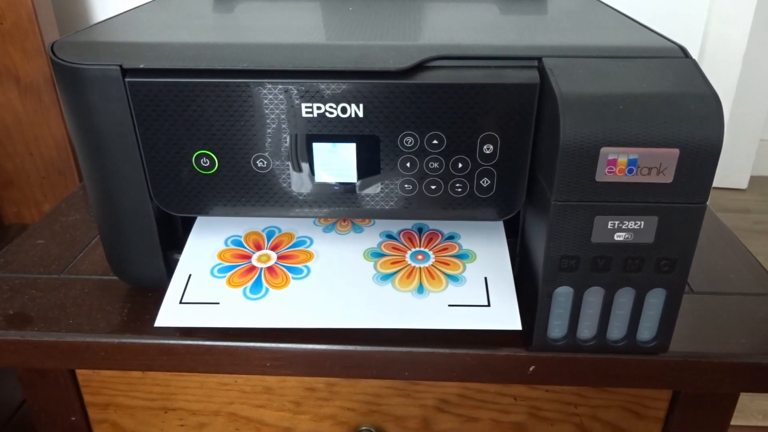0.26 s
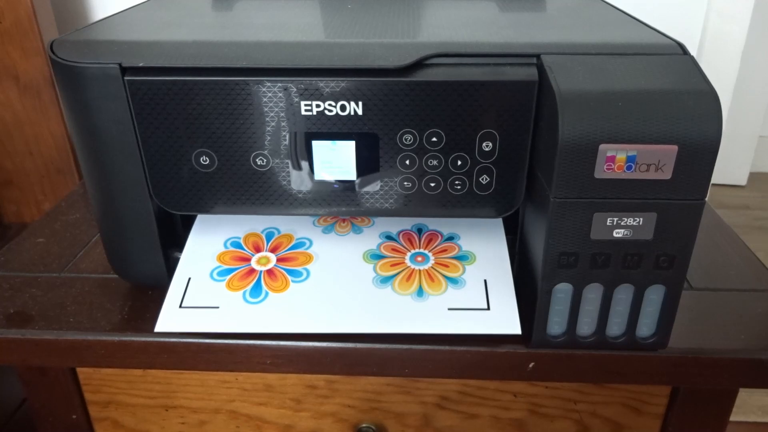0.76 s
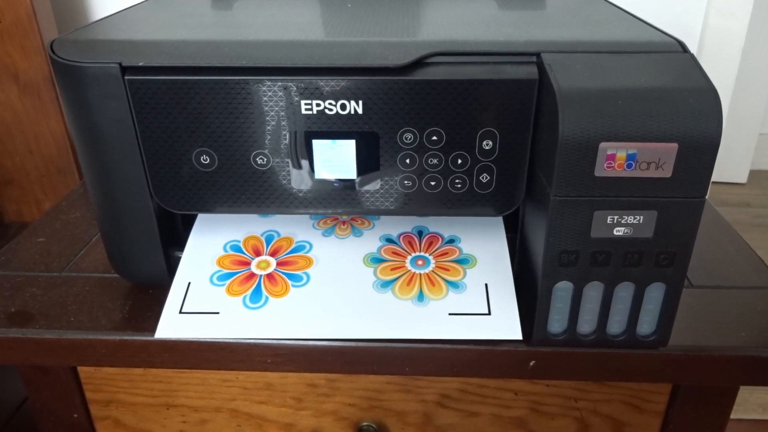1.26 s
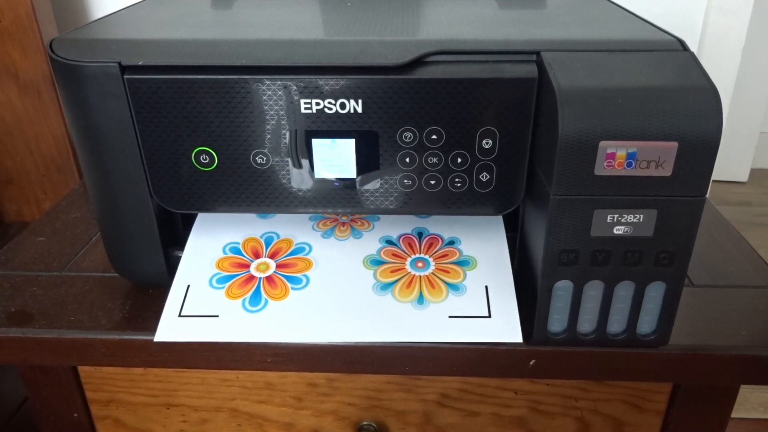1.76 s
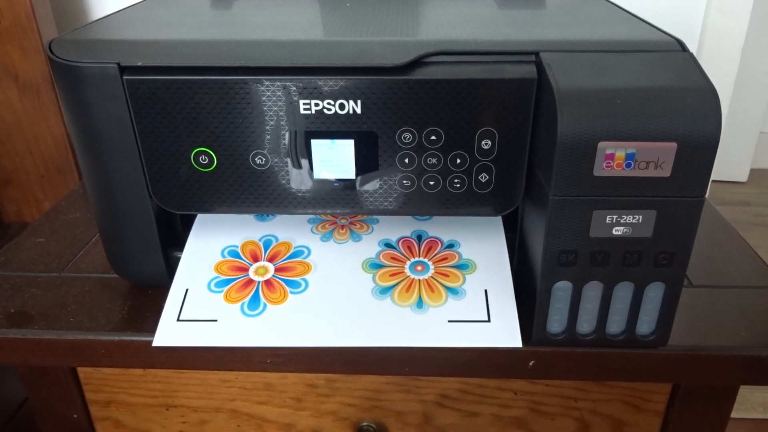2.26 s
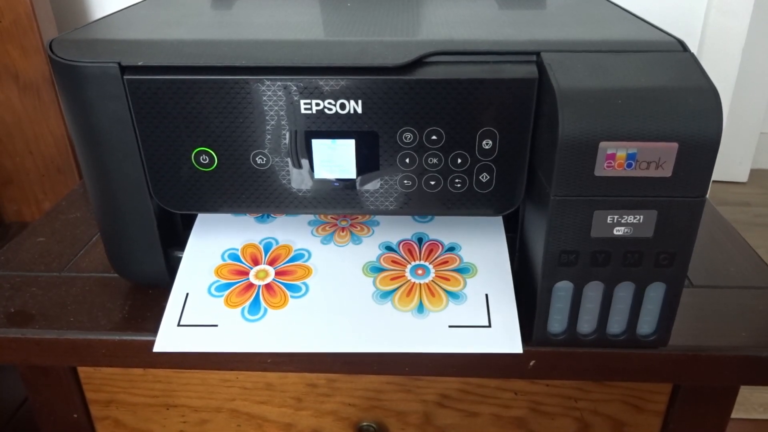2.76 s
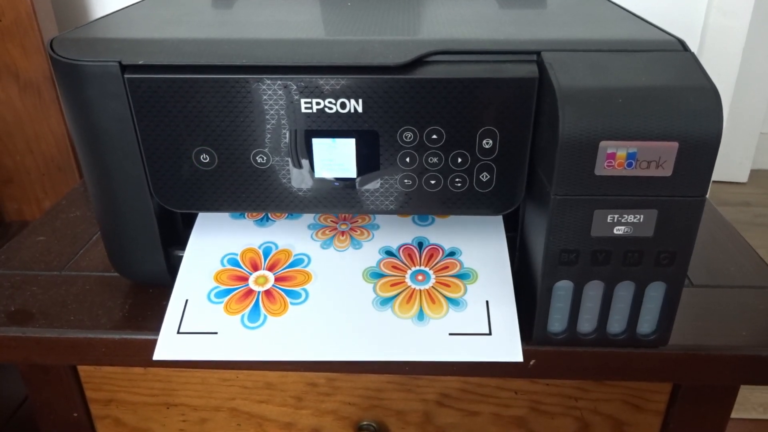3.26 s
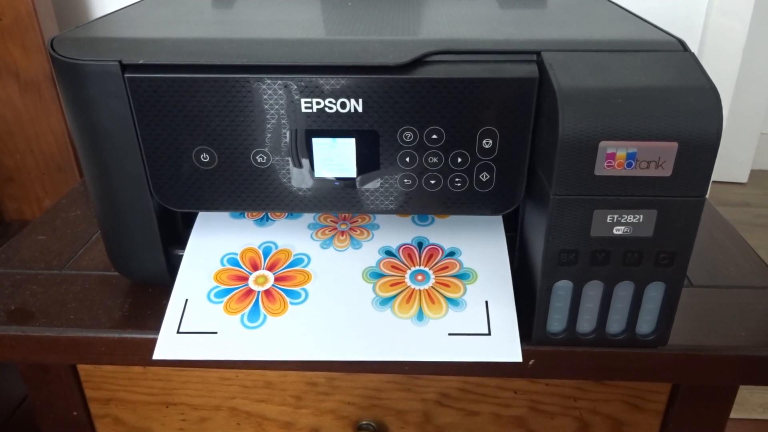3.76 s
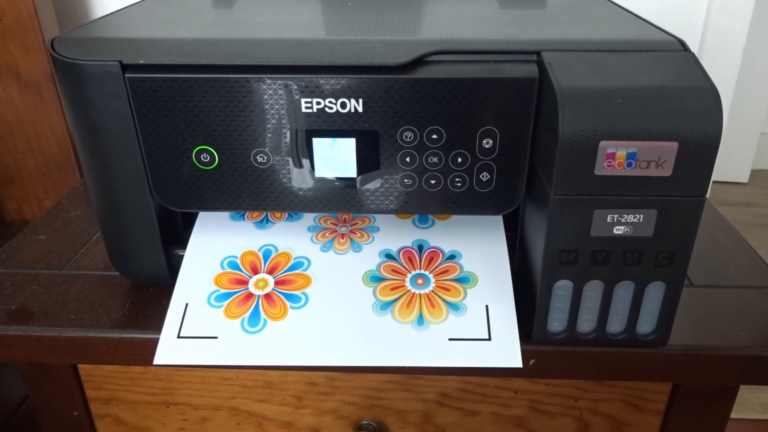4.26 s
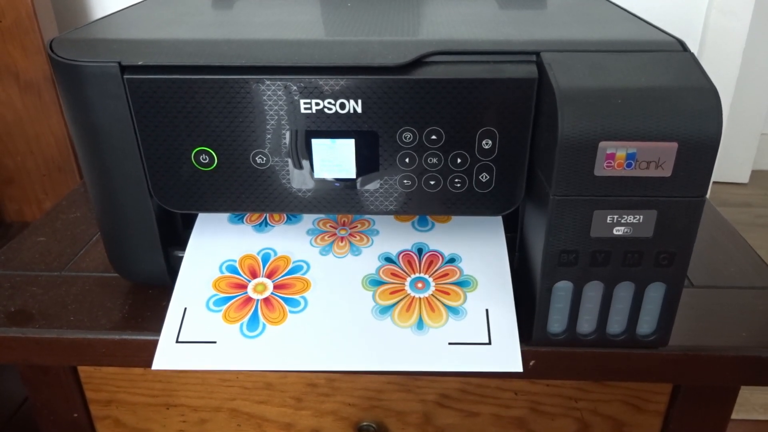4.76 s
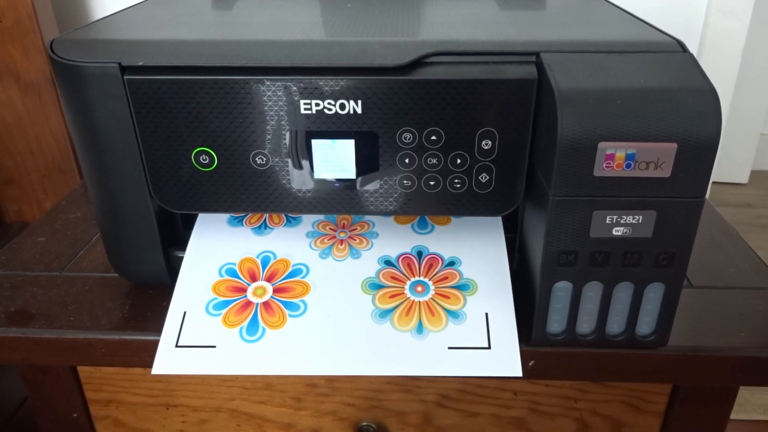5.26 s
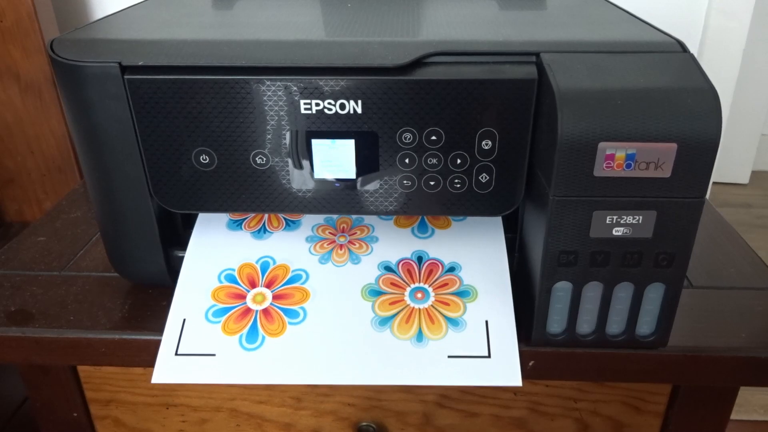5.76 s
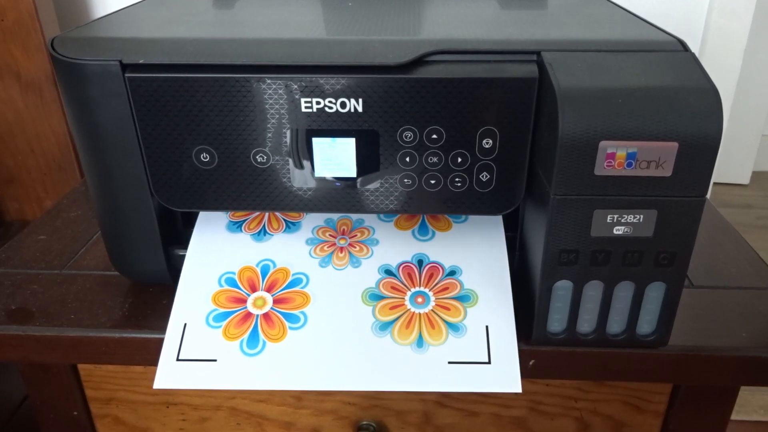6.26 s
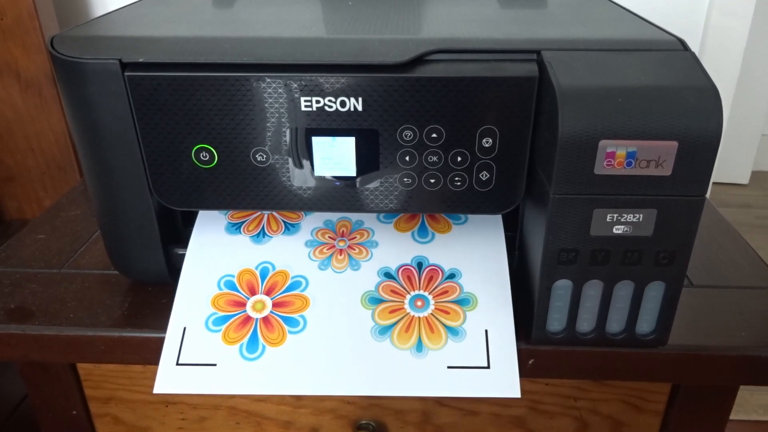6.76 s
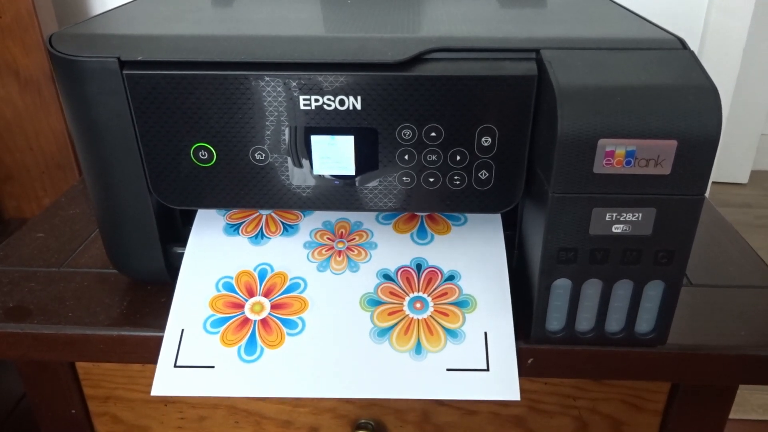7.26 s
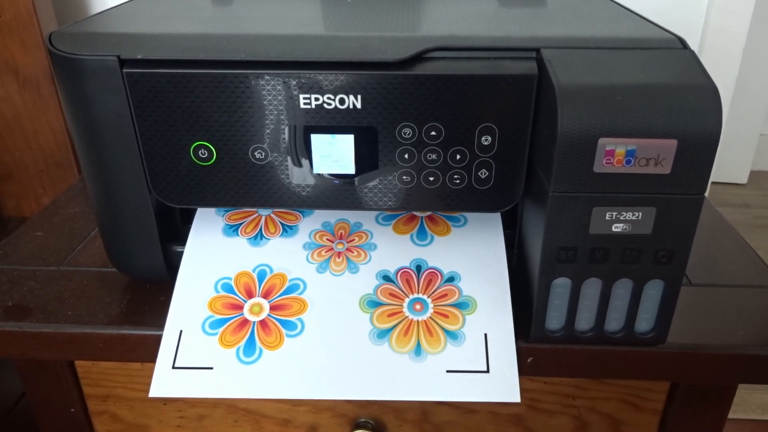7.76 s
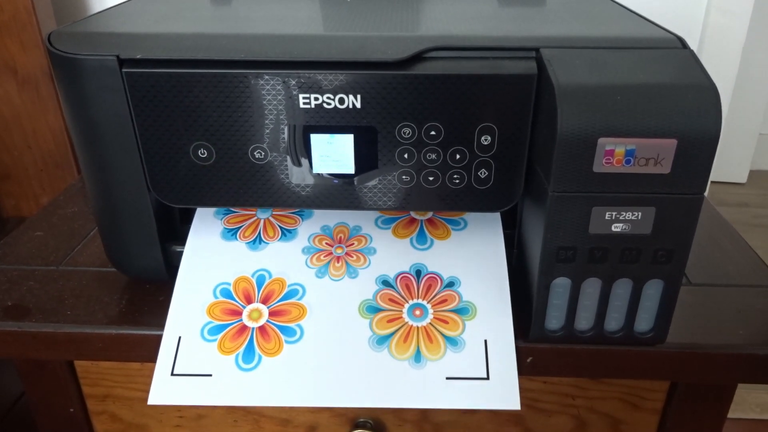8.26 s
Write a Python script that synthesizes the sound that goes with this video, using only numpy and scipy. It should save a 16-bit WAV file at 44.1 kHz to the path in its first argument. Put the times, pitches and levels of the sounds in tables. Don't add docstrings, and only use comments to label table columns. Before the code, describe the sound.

Close, steady printer shuttling: whirring strokes with light ticks, plastic knocks about every 0.4 seconds, a brief park, and one sharp paper snap.

```python
import sys
import numpy as np
from scipy import signal
from scipy.fft import rfft, irfft, next_fast_len
from scipy.io import wavfile
from scipy.ndimage import uniform_filter1d

SR = 44100
rng = np.random.default_rng(int(sys.argv[2]) if len(sys.argv) > 2 else 0)


def persist_wave(psi):
    counts = np.round(np.clip(psi, -1, 1) * 32767).astype(np.int16)
    wavfile.write(sys.argv[1], SR, np.atleast_2d(counts).T)


def how_loud(loudness_db):
    steps = np.asarray(loudness_db, float) / 20
    return 10 ** steps


N = 375291
t = np.arange(N) / SR

# start in seconds, then knock, rattle, settling thump and thud in dB.
TURNS = [(0.0014, -26.5, -44, -49.5, -43), (0.399, -28, -43, -48.5, -43),
         (0.7947, -31, -42.5, -50.5, -43.5), (1.1946, -28, -43, -56, -41.5),
         (1.595, -24, -41.5, -46.5, -44), (2.0067, -17.5, -40.5, -51, -44),
         (2.4175, -14.5, -41.5, -50, -43), (2.8384, -26.5, -42.5, -53.5, -43),
         (3.2533, -20.5, -39, -48, -44.5), (4.0792, -38, -46, -56, -44.5), (4.526, -27, -39, -46.5, -47),
         (4.9381, -24, -46.5, -54, -41), (5.3564, -23, -43, -49.5, -45), (5.779, -40, -45.5, -54.5, -44),
         (6.195, -25.5, -44, -47, -42), (6.6079, -31, -44, -54, -41), (7.026, -23.5, -42.5, -52, -40.5),
         (7.444, -21.5, -41.5, -58, -45.5), (7.8626, -15.5, -41, -48, -43),
         (8.2789, -28.5, -43.5, -68, -41.5)]
TURN_S = np.array(TURNS)[:, 0]
# time in seconds, level in dB.
LATCH = [(0.739, -26.5), (1.5393, -25), (2.3543, -26), (3.188, -26), (4.461, -26), (5.2893, -25),
         (6.132, -25.5), (6.9586, -25.5), (7.7983, -26)]
# time in seconds, level in dB, 60 dB decay time in seconds.
CLACK = [
    (4.5704, -11.5, .025),
    (4.578, -12, 0.026),
    (4.586, -20, 0.034),
    (4.598, -27, .03),
    (4.617, -20, .03),
    (4.625, -22, 0.024),
    (4.652, -23, 0.049),
    (4.567, -31, .02),
]
# frequency in Hz, level in dB per Hz.
KNOCK = [(120, -60), (200, -44), (579, 4), (1590, 2), (2440, -0.5), (3500, 1.5), (4220, -7), (6590, -21),
         (12000, -30), (15600, -61), (22000, -120)]
# frequency in Hz, level in dB.
ECHO_COLOUR = [(100, -6), (800, -2), (1500, 0), (6500, 0), (10000, -3), (16000, -10)]

PAUSE_S = 3.70
MOTOR_HZ = 292.3
JET_DELAY_S = .1118
TURNED_S, TURNED_DB = 3.25, -5.5
BUMP_CONTACT = 3.0


def shape(points, size):
    hz, db = np.transpose(points)
    return how_loud(np.interp(np.log(np.fft.rfftfreq(size, 1 / SR) + 1), np.log(hz), db))


def colour(x, points, size=8192):
    ceps = irfft(np.log(shape(points, size)))
    ceps[1:size // 2] *= 2
    ceps[size // 2 + 1:] = 0
    taps = irfft(np.exp(rfft(ceps)))[:size // 4]
    return signal.fftconvolve(x, taps / np.sqrt(np.sum(taps ** 2)))[:N]


def resonate(x, hz, width_hz):
    return signal.lfilter(*signal.iirpeak(hz, hz / width_hz, SR), x)


def walk(rate):
    count = int(t[-1] * rate) + 2
    return 1.22 * np.interp(t * rate, np.arange(count), rng.standard_normal(count))


def grit(spread_db):
    x = rng.standard_normal(N) * how_loud(spread_db * rng.exponential(size=N))
    return x / x.std()


def bursts(times, dbs, rise, hold, t60):
    out = np.zeros(N)
    count = len(times)
    for s, db, fall in zip(times, np.broadcast_to(dbs, count), np.broadcast_to(t60, count)):
        now = slice(max(int((s - rise) * SR), 0), int((s + hold + fall) * SR))
        late = t[now] - s
        out[now] += how_loud(db - 60 * np.maximum(late - hold, 0) / fall) * np.clip(1 + late / rise, 0, 1)
    return out


def tail(x, t60):
    s = np.arange(int(t60 * SR)) / SR
    taps = rng.standard_normal(len(s)) * how_loud(-60 * s / t60)
    return signal.fftconvolve(x, taps / np.sqrt(np.sum(taps ** 2)))[:N]


def whistle(hz, db):
    return np.sqrt(2) * how_loud(db + 2.0 * walk(22)) * np.sin(2 * np.pi * hz * t)


def wander(width_hz):
    return walk(width_hz) + 1j * walk(width_hz)


def drone(hz, width_hz, db):
    return how_loud(db) * (wander(width_hz) * np.exp(2j * np.pi * hz * t)).real


def motion():
    # time in seconds, share of full speed.
    speed_up = [(-.07, .1), (-.004, .77), (.006, .78), (.02, .88), (.04, .96), (.065, 1)]
    brake_s = .035
    stroke = np.maximum(np.searchsorted(TURN_S, t) - 1, 0)
    ends = np.append(TURN_S[1:], t[-1] + 1)
    ends = np.where((TURN_S < PAUSE_S) & (ends > PAUSE_S), PAUSE_S, ends)
    since_turn = t - TURN_S[stroke]
    since = since_turn - JET_DELAY_S
    brake = np.clip((ends[stroke] + .02 - t) / brake_s, 0, 1)
    old_stroke = np.clip(.6 - since_turn / brake_s, 0, 1)
    speed = np.maximum(np.interp(since, *np.transpose(speed_up)) * brake, old_stroke)
    return speed, since, stroke % 2


def whine(speed, since, back):
    # multiple of the motor rate, width in Hz, level out and
    # level back in dB, time of the swell out and back in seconds after the nozzles start.
    partials = [(0.499, 27, -70, -77, 0.082, 0.096), (1.059, 60, -66, -65.5, 0.008, 0.078),
                (2.056, 110, -64.5, -69.5, 0.163, 0.13), (4.31, 170, -67.5, -60.5, 0.14, 0.13),
                (6.7, 170, -68.5, -68, 0.205, 0.215), (5.39, 32, -95, -68, .1, 0.042),
                (9.82, 47, -72.5, -70, 0.14, 0.17), (11.39, 320, -68, -64, 0.092, 0.056),
                (14.74, 90, -72, -76, 0.14, 0.26), (19.94, 400, -65.5, -62, 0.13, 0.168),
                (20.47, 510, -64.5, -73, 0.13, 0.1), (23.5, 550, -86, -70, 0.28, 0.11),
                (25.1, 1100, -67.5, -67.5, 0.125, 0.24), (27.16, 580, -63, -65, 0.176, 0.084),
                (30.1, 120, -67.5, -69.5, 0.23, 0.11)]
    swell_db, swell_s, drift_per_s = 4.5, 0.026, .12
    phase = 2 * np.pi * np.cumsum(MOTOR_HZ * speed) / SR
    rail_phase = 2 * np.pi * MOTOR_HZ * t
    climb = drift_per_s * np.clip(since - .15, -.2, .2) * (1 - 2 * back)
    drift = 2 * np.pi * np.cumsum(MOTOR_HZ * speed * climb) / SR
    out = 0
    for k, width_hz, out_db, back_db, out_s, back_s in partials:
        swell = swell_db * np.exp(-((since - np.where(back, back_s, out_s)) / swell_s) ** 2)
        turning = (rail_phase if 19 < k < 21 else phase) + drift * (width_hz > 200)
        steady = .8 * (k > 29)
        tone = (steady + wander(width_hz)) * np.exp(1j * k * turning)
        out = out + how_loud(np.where(back, back_db, out_db) + swell) * tone.real
    return out * uniform_filter1d(how_loud(-40 * (1 - speed)) * (speed > .62), size=400)


def nozzles(speed):
    multiple, octave_db, rise_db = 30, -6, -71
    out_db, back_db, stop_db, t60_s = -54.5, -51.5, -61, .04
    phase = multiple * 2 * np.pi * np.cumsum(MOTOR_HZ * speed) / SR
    chirp = np.sin(phase) + how_loud(octave_db) * np.sin(2 * phase) * (speed < .93)
    quiet = [9, 10]
    starts = np.delete(TURN_S + JET_DELAY_S, quiet)
    start_db = np.delete(np.where(np.arange(len(TURN_S)) % 2, back_db, out_db), quiet)
    sung = bursts(starts, start_db, 0.0042, 0.0046, t60_s)
    sung = sung + bursts(TURN_S[1:] - .008, stop_db, 0.0072, 0.015, t60_s)
    chirp = chirp * sung * how_loud(2.0 * walk(300) + 0.5)
    rising = bursts(starts + 0.011, rise_db, .006, .014, .03) * how_loud(3 * walk(150)) * np.sin(2 * phase)
    return chirp * np.clip(3 * speed - .3, 0, 1) + rising * (speed < .93)


def rail(speed):
    # frequency in Hz, level in dB per Hz.
    rub_colour = [(59, -63), (100, -51), (140, -12), (295, -5), (365, -5), (397, -0.5), (816, 0.5),
                  (1100, -0.5), (1950, -7.5), (3310, -6.5), (5390, -11.5), (5860, -8.5), (6380, -9.5),
                  (8060, -13), (15900, -37)]
    air_colour = [(5470, -12.5), (9300, -6), (11500, -5), (14100, -8.5), (15900, -11)]
    # time in seconds, change in dB.
    parking = [
        (3.64, -6),
        (3.72, 0.5),
        (3.77, -3),
        (3.83, -16),
        (3.92, -18),
        (4.07, -28),
        (4.13, -2),
        (4.23, -4),
        (4.32, -6.5),
    ]
    load_db = np.interp(t, *np.transpose(parking))
    slow = uniform_filter1d(1 - speed, size=2000)
    rub = colour(grit(spread_db=1.5), rub_colour)
    low, upto = (signal.sosfilt(signal.butter(3, hz, fs=SR, output="sos"), rub) for hz in (3000, 9500))
    air = colour(grit(spread_db=2.0), air_colour) * how_loud(-1.5 * (t < TURNED_S) + 1.2 * walk(9))
    out = 0
    for band, db, slow_db, flicker_db in ((low, -50.5, -5.5, 1.5), (upto - low, -48.5, -3, 1.2),
                                          (air, -58, -2.5, 1.5)):
        level_db = db + load_db + slow_db * slow + flicker_db * walk(60)
        out = out + band / band.std() * how_loud(level_db)
    return out


def panel_hum(since, back):
    hz, width_hz, rise_s, t60_s = 1086, 60, 0.022, 0.12
    starts, ends = TURN_S[1::2], TURN_S[::2]
    level = how_loud(-61) * uniform_filter1d(1. * back * (since > 0), size=1500)
    level = level + bursts(starts + .15, -55, rise_s, 0.0065, t60_s)
    level = level + bursts(ends[1:] - .102, -53, rise_s, 0.0085, t60_s)
    level = level + bursts(ends - .07, -57, 0.028, 0.051, t60_s)
    waver = .9 + .35 * wander(width_hz)
    return level * (waver * np.exp(2j * np.pi * hz * t)).real


def groans():
    # frequency in Hz, width in Hz, level in dB.
    belt = [(296, 80, -60), (598, 120, -54), (797, 130, -60)]
    rundown = [(242, 80, -60), (409, 200, -57), (680, 250, -59)]
    far = np.delete(TURN_S[1::2], 4)
    braking = np.append(far, PAUSE_S - .03) - .015
    latch_s = np.array(LATCH)[:, 0]
    out = bursts(braking, 0, 0.082, 0.017, 0.11) * sum(drone(*row) for row in belt)
    shell = drone(hz=600, width_hz=150, db=-53)
    chest = drone(hz=290, width_hz=110, db=-58)
    out = out + bursts(latch_s + 0.0051, 0, .008, 0.0091, 0.19) * shell
    out = out + bursts(far + 0.048, 0, .04, 0.13, .25) * chest
    return out + bursts([3.755], 0, 0.15, 0.042, 0.37) * sum(drone(*row) for row in rundown)


def case(x):
    # frequency in Hz, width in Hz, level in dB.
    modes = [(146, 30, -11), (215, 40, -4), (290, 50, -2), (515, 130, -1), (720, 110, -2), (1085, 120, 0),
             (1400, 140, -2), (1930, 250, -1), (2700, 400, -3)]
    return x + sum(how_loud(db + 2.5 * walk(6.7)) * resonate(x, hz, width_hz) for hz, width_hz, db in modes)


def blows(times, dbs, points, contact):
    x = bursts(times, dbs - 6, .001, .0015, .03) * grit(1.5)
    x[(times * SR).astype(int)] += contact * how_loud(dbs)
    return colour(x, points)


def chatter(s, rattle_db):
    chance = rng.random((len(s), 8))
    times = s[:, None] + .006 + .065 * (np.arange(4) + chance[:, :4]) / 4
    dbs = rattle_db[:, None] - 1 - 8 * chance[:, 4:] - 40 * (times - s[:, None])
    return blows(times.ravel(), dbs.ravel(), KNOCK, BUMP_CONTACT)


def cracks(rows, cycles, gain_db):
    out, late = np.zeros(N), np.arange(1200) / SR
    for s, db, hz in rows:
        turned = late * hz
        ring = turned / cycles * np.exp(1 - turned / cycles) * np.sin(2 * np.pi * turned)
        out[int((s + .0005) * SR):][:1200] += how_loud(db + gain_db) * ring
    return out


def paper_feed():
    # frequency in Hz, level in dB per Hz.
    feed_colour = [(40, -69), (85, -42), (120, -43), (231, -18.5), (472, 2), (1260, 1.5), (1400, 3),
                   (1510, -13), (2140, -2), (2420, -20), (3030, -3.5), (4120, -9), (7770, -10),
                   (15900, -22)]
    thump_colour = [(59, -67), (110, -12.5), (191, 0), (490, 2.5), (800, -1), (1110, -9.5), (1380, -4),
                    (1630, -12), (2030, -7), (4000, -18.5), (5200, -40), (8800, -120)]
    bump_colour = [(180, -31), (300, -19), (1110, -1), (1660, -3.5), (3380, 1), (4500, -12), (6080, -31),
                   (12000, -48), (15600, -73), (22000, -120)]
    # time in seconds, level in dB.
    bumps = [(1.6318, -23.5), (2.0383, -19), (2.438, -38), (2.4764, -50.5), (4.9602, -50), (4.9756, -30),
             (5.808, -26), (5.813, -28.5), (6.2156, -34), (6.6283, -34), (7.042, -47), (7.0656, -37),
             (7.8748, -42), (7.9438, -47), (8.313, -35)]
    # time in seconds, level in dB.
    park = [
        (3.719, -38.5),
        (3.778, -52),
        (3.829, -54),
    ]
    # time in seconds,
    # level in dB, pitch in Hz.
    gear_cracks = [(0.4002, -37, 2310), (0.7959, -37, 1910), (0.798, -33, 1930), (1.1938, -38, 1910),
                   (1.5938, -30, 1960), (1.6301, -28.5, 2370), (2.0059, -27, 1920), (2.0086, -27, 2120),
                   (2.012, -36, 1020), (2.0377, -22.5, 3320), (2.4171, -26, 2400), (2.4374, -33, 1910),
                   (2.4758, -42, 1976), (2.8387, -35, 2220), (2.846, -38, 3200), (3.2545, -36, 1980),
                   (4.0785, -32.5, 1954), (4.0805, -37, 1930), (4.5231, -31, 2180), (4.5775, -18, 6970),
                   (4.9376, -30, 1930), (4.9749, -29.5, 2384), (5.3553, -29, 1823), (5.7783, -31, 2000),
                   (5.8072, -33, 2120), (6.1948, -31.5, 1913), (6.6072, -31, 1940), (6.609, -36, 3300),
                   (7.0254, -32, 1798), (7.0429, -27, 1940), (7.0654, -32, 2280), (7.443, -46, 1780),
                   (7.8619, -18.5, 2460), (7.8759, -33, 1865), (8.2789, -32, 2064), (8.3125, -37, 1900)]
    gear_taps = [(0.0269, -43, 980), (0.0722, -45, 1350.0), (0.4085, -41, 850.0), (0.4322, -43, 930),
                 (0.4893, -41, 710.0), (0.8496, -55, 1310.0), (0.8669, -49, 1160.0), (0.8812, -46, 1040.0),
                 (1.205, -56, 1300.0), (1.2232, -44, 1970.0), (1.6134, -43, 1040), (1.6694, -45, 1080),
                 (1.6805, -39, 1450), (2.0286, -32, 1990), (2.0588, -37, 2250), (2.4844, -43, 1100.0),
                 (2.4917, -45, 1060.0), (2.8616, -43, 1170.0), (2.875, -49, 716), (2.9039, -48, 840.0),
                 (3.3293, -43, 980), (3.3388, -45, 1100), (4.1078, -42, 2010.0), (5.0114, -45, 1040.0),
                 (5.384, -40, 1020.0), (5.4088, -45, 1140.0), (5.4275, -42.5, 1590), (5.435, -43, 937),
                 (5.8724, -50, 886), (6.2245, -41.5, 1026), (6.2485, -42.5, 750), (6.2642, -48, 1070),
                 (6.6492, -45, 2120.0), (6.6705, -48, 2150), (6.6898, -44, 1090), (7.0532, -39, 730),
                 (7.0972, -43, 1110), (7.114, -43, 980), (7.4697, -40, 1770), (7.4895, -43, 1004),
                 (7.4993, -43, 1060), (7.5152, -46.5, 711), (7.8866, -33, 710.0), (8.3222, -44, 712)]
    s, knock_db, rattle_db, thump_db, thud_db = np.transpose(TURNS)
    rattle = bursts(s + 0.0038, rattle_db, 0.0063, 0.029, 0.093) * how_loud(1.5 * walk(120) - 0.5)
    thump = bursts(s + 0.072, thump_db, 0.0072, 0.0026, 0.46)
    thump = thump + bursts(s + 0.014, thud_db, 0.016, 0.0021, 0.35)
    thump = thump + bursts(*np.transpose(park), 0.0097, 0.022, 0.38) * how_loud(-9.5)
    knocks = blows(s, knock_db, KNOCK, contact=4.0)
    knocks = knocks + blows(*np.transpose(bumps), bump_colour, BUMP_CONTACT)
    hits = how_loud(-6.5) * knocks + chatter(s, rattle_db)
    hits = hits + colour(rattle * grit(3), feed_colour) + colour(thump * grit(1.5), thump_colour)
    boom_hz = 600 * how_loud(1.6 * rng.standard_normal(len(s)))
    booms = zip(s + .005, thud_db, boom_hz)
    teeth = cracks(gear_cracks, cycles=0.91, gain_db=1) + cracks(gear_taps, cycles=1.68, gain_db=0.5)
    return how_loud(-6.0) * case(hits) + teeth + cracks(booms, cycles=1.7, gain_db=3)


def clack():
    # frequency in Hz, level in dB per Hz.
    sheet_colour = [(40, -79), (110, -13), (250, -14), (520, -12), (780, -2), (1100, -5), (1550, -7.5),
                    (2050, -2.5), (3300, -6.5), (4050, -13), (4700, -2), (5900, -2), (7200, -5.5),
                    (10500, -0.5), (15900, -8.5)]
    # frequency in Hz, width in Hz, level in dB.
    tray = [(760, 250, 2), (1017, 80, -2), (1976, 90, 0), (2640, 200, -6), (3494, 120, -3), (4900, 150, -2),
            (5884, 100, 2), (6487, 100, 0)]
    s, db, t60 = np.transpose(CLACK)
    snaps = bursts(s, db - 9, .003, .001, t60) * grit(1.5)
    rustle = bursts(s[:1], -32.5, .003, .03, 0.26) * grit(2.0)
    sheet = colour(snaps + colour(rustle, ECHO_COLOUR), sheet_colour)
    ring = sum(how_loud(db) * resonate(sheet, hz, width_hz) for hz, width_hz, db in tray)
    return how_loud(-2.2) * (sheet + ring)


def ticks():
    # time in seconds, level in dB, panel level relative to it in dB.
    stray = [
        (2.008, -35.5, 12),
        (3.2836, -42, 0),
        (3.6965, -27.5, -26),
        (4.22, -39, -3),
    ]
    # time in seconds, level in dB.
    cable = [(0.242, -35.5), (1.038, -35), (1.8456, -36), (2.672, -36), (3.5022, -35.5), (4.7702, -34),
             (5.611, -37), (6.4428, -37), (7.278, -36), (8.11, -37)]
    # frequency in Hz, level in dB per Hz.
    tick_colour = [(1180, -47), (2000, -8), (2700, 1), (3190, -1), (3800, 2.5), (4250, -2), (8660, -2.5),
                   (9610, -12), (11900, -7.5), (15900, -22)]
    latch_body_db, cable_body_db = 7, -6.5
    rows = stray + [(s, db - 5.5, latch_body_db) for s, db in LATCH]
    rows = rows + [(s, db + 1.2, cable_body_db) for s, db in cable]
    for lag_s, db in ((-0.036, -43), (0.079, -43.5)):
        rows = rows + [(row[0] + lag_s, db, cable_body_db) for row in cable]
    rows = rows + [(row[0] + 0.0806, row[2] - 5, latch_body_db) for row in TURNS]
    s, db, body_db = np.transpose(rows)
    swell = bursts(s + .0025, db - 10.5, .006, .001, .028)
    panel = bursts(s + 0.0035, db + body_db - 1.5, 0.0041, 0.0023, .045) * grit(2.0)
    return colour(swell * grit(2.2), tick_colour) + resonate(panel, 1150, 1150 / 3.0)


def spits():
    # time in seconds, level in dB.
    bright_spits = [(0.1959, -46), (0.3324, -47), (0.7346, -54), (0.992, -44), (1.1274, -47), (1.7997, -45),
                    (2.6268, -45.5), (3.457, -51), (3.696, -29), (4.4607, -29), (5.5653, -53), (6.3972, -51),
                    (6.5324, -49), (7.2334, -54)]
    # frequency in Hz, level in dB per Hz.
    spit_colour = [(3000, -37), (8000, -1), (10000, -3), (13500, -2), (15200, -9), (16500, -39)]
    s, db = np.transpose(bright_spits + [(at - 0.0054, db - 13.5) for at, db in LATCH])
    return colour(bursts(s + .001, db - 9, .0015, .001, .02) * grit(1.5), spit_colour)


def electronics(since, back):
    # frequency in Hz, level in dB.
    hold = [(10810, -75), (11246, -75), (14271, -76), (14702, -68), (15132, -69.5)]
    # start and end in seconds, frequency in Hz, level in dB.
    idle = [
        (3.5, 4.06, 4990, -75),
        (3.78, 3.99, 11240, -76),
        (3.82, 4.0, 9948, -83),
        (4.02, 4.1, 8770, -66),
        (3.8, 4.07, 1995, -72),
        (4.14, 4.21, 11240, -78),
    ]
    waiting = uniform_filter1d(1. * ((since > -.1) & (since < 0) & (abs(t - 4.35) > .35)), size=900)
    waiting = waiting * how_loud(-4 * back * (t < TURNED_S) + 1.6 * walk(25))
    parked = 0
    for a, b, hz, db in idle:
        parked = parked + np.interp(t, [a - .01, a, b, b + 0.019], [0, 1, 1, 0]) * whistle(hz, db)
    beam = how_loud(TURNED_DB * (t > TURNED_S))
    return waiting * sum(whistle(hz, db) * (beam if hz > 14500 else 1) for hz, db in hold) + parked


def swoops():
    top_hz, fall_hz_per_s = 15750, 36000
    starts = TURN_S[1:] - .014
    late = t - starts[np.maximum(np.searchsorted(starts, t) - 1, 0)]
    phase = 2 * np.pi * np.cumsum(top_hz - fall_hz_per_s * np.clip(late, 0, .03)) / SR
    flutter = how_loud(3 * walk(150) + TURNED_DB / 2 * (t > TURNED_S))
    return bursts(starts, -67, .004, .022, .03) * flutter * np.sin(phase)


def echoes(hits):
    return how_loud(-7.5) * colour(tail(hits, 0.36), ECHO_COLOUR)


def port_difference(printer, snap):
    # frequency in Hz, side relative to mid in dB.
    width = [(60, -37), (300, -22), (700, -12.5), (2400, -17), (6000, -15.5), (9000, -14.5), (15000, -13.5)]
    # frequency in Hz, level in dB per Hz.
    around = [(15, -53), (25, -25), (70, -30), (161, -25.5), (404, -9.5), (543, -10), (712, 5), (1010, -10),
              (1190, -8), (1480, -9.5), (5850, -22), (15900, -46)]
    size = next_fast_len(N)
    late = tail(np.roll(printer, int(.006 * SR)), .12)
    side = irfft(rfft(late, size) * shape(width, size), size)[:N]
    side = side + how_loud(-21) * tail(snap, .03) + how_loud(-55) * colour(rng.standard_normal(N), around)
    edge = signal.sosfilt(signal.butter(2, 8000, "high", fs=SR, output="sos"), snap)
    first = bursts([CLACK[0][0] - .002], 2, .003, 0.0033, 0.035)
    return side + tail(edge * first, 0.0037)


def room():
    # frequency in Hz, level in dB per Hz.
    room_colour = [(15, -70), (25, -42), (150, -24), (400, -9), (760, -8), (1200, -16), (1900, -10),
                   (3000, -20), (5000, -19), (9000, -22), (15900, -26)]
    return how_loud(-58) * colour(rng.standard_normal(N), room_colour)


def scene():
    speed, since, back = motion()
    snap = clack()
    hits = paper_feed() + ticks() + spits() + snap
    steady = whine(speed, since, back) + nozzles(speed) + rail(speed) + panel_hum(since, back)
    steady = steady + groans() + electronics(since, back) + swoops()
    printer = hits + echoes(hits) + steady
    mid = printer + room()
    side = port_difference(printer, snap)
    return np.array([mid + side, mid - side])


def roll_off(x):
    return signal.sosfilt(signal.butter(12, 15830, fs=SR, output="sos"), x)


def record(dry):
    thin = signal.sosfilt(signal.butter(1, 110, "high", fs=SR, output="sos"), dry)
    dull = signal.sosfilt(signal.ellip(10, .3, 80, 15600, fs=SR, output="sos"), thin)
    return roll_off(dull)


dry = scene()
out = record(dry)
persist_wave(out)
```